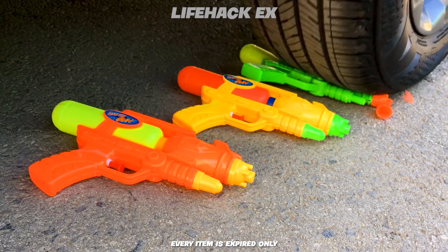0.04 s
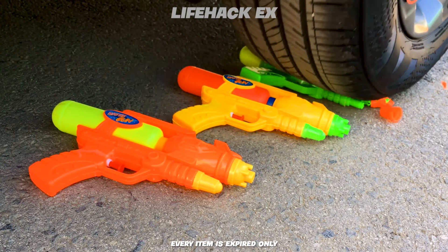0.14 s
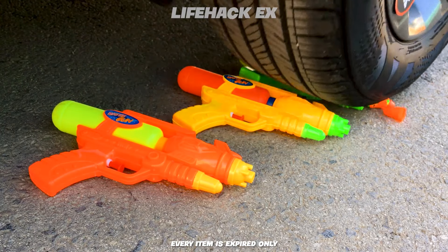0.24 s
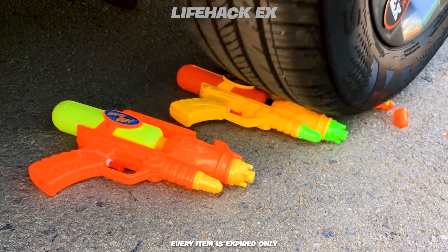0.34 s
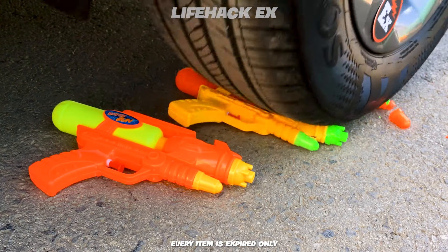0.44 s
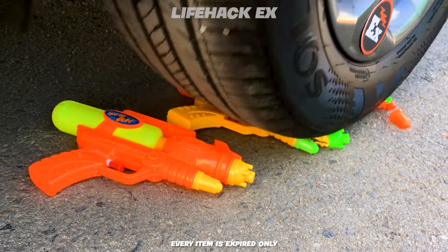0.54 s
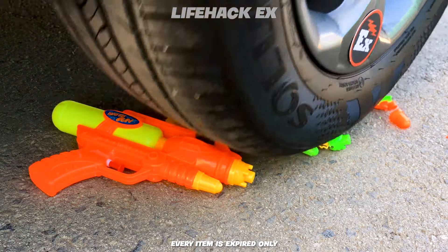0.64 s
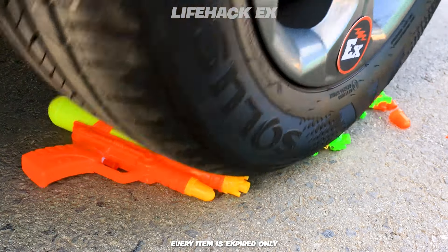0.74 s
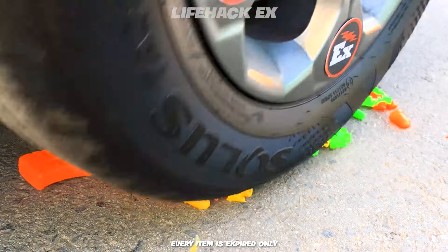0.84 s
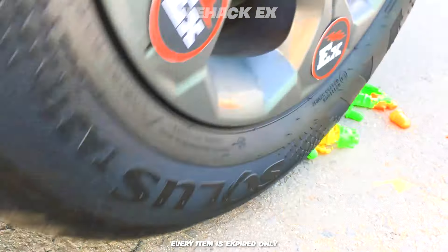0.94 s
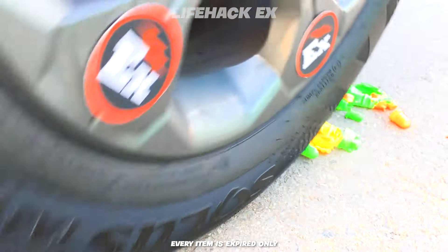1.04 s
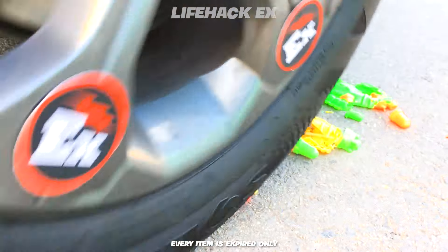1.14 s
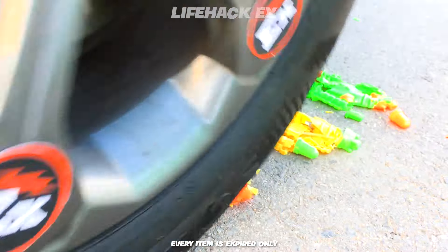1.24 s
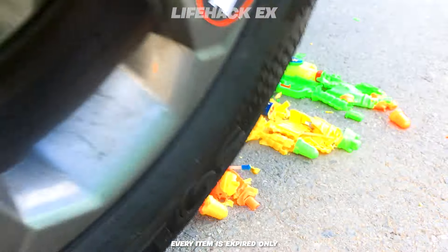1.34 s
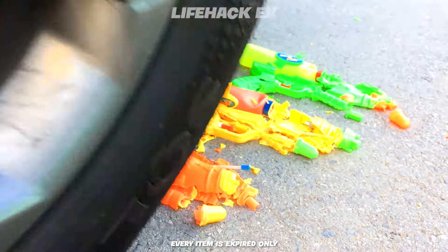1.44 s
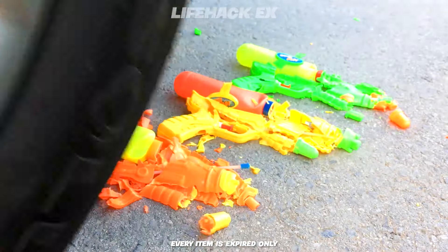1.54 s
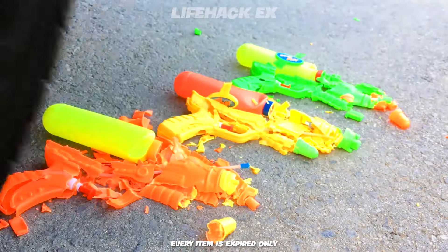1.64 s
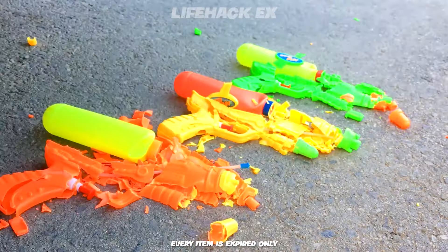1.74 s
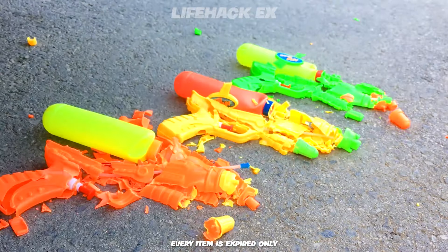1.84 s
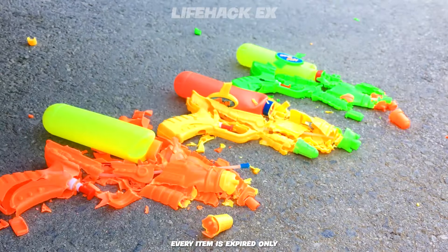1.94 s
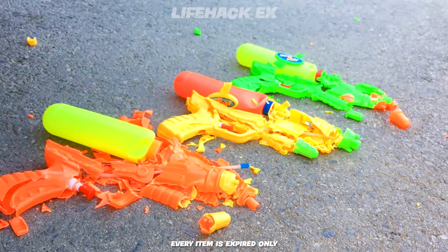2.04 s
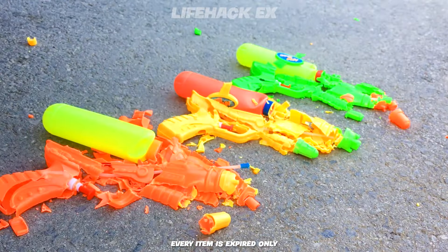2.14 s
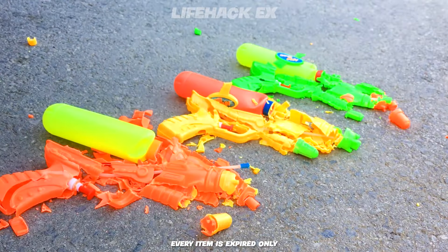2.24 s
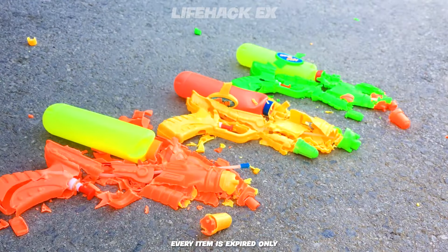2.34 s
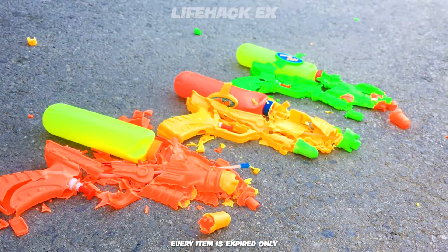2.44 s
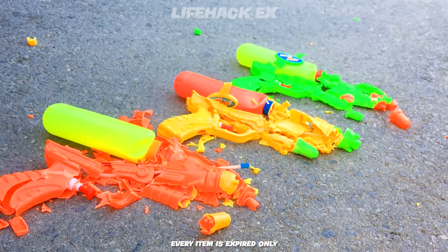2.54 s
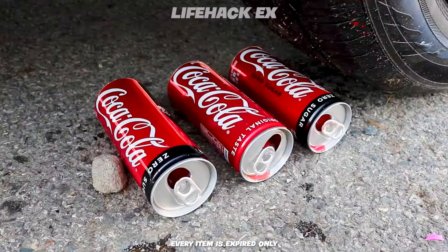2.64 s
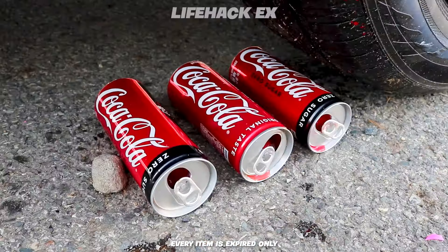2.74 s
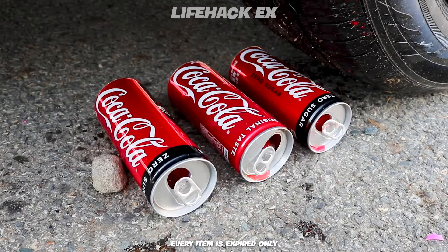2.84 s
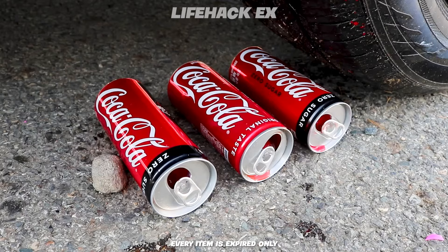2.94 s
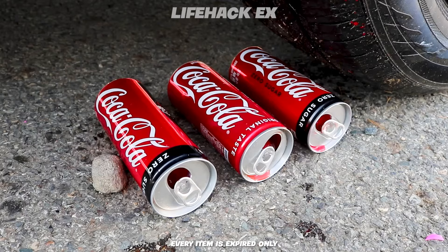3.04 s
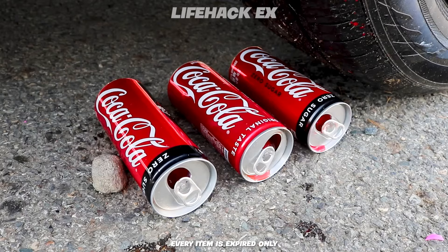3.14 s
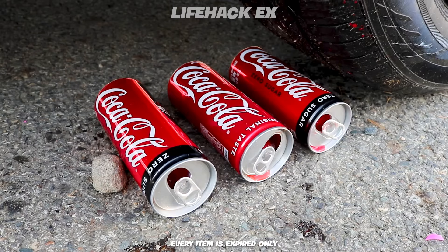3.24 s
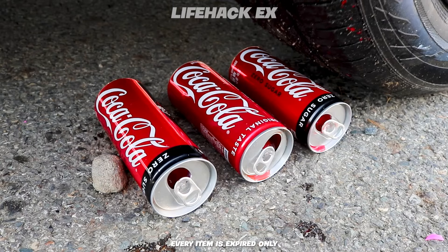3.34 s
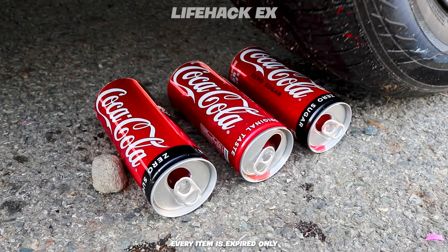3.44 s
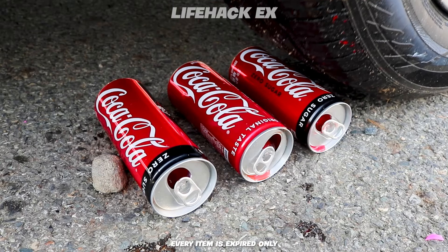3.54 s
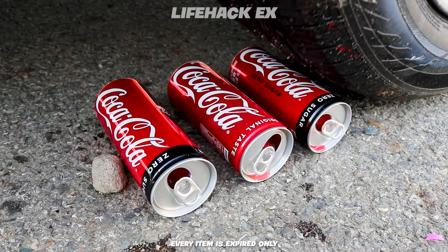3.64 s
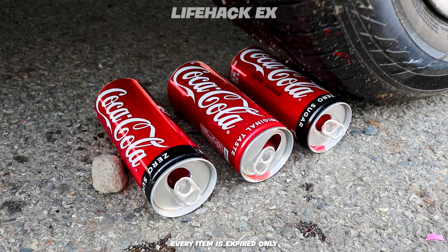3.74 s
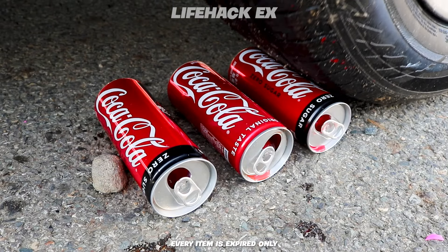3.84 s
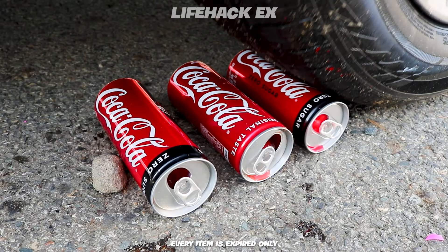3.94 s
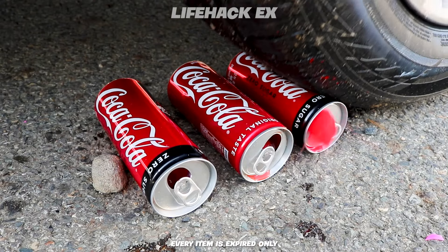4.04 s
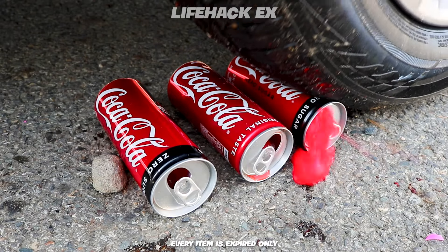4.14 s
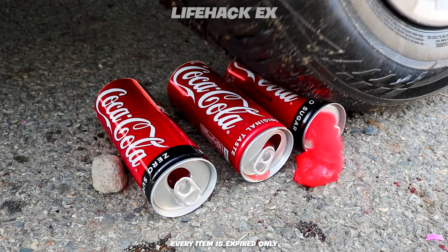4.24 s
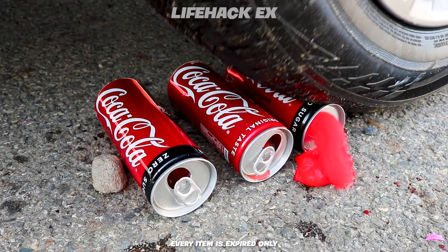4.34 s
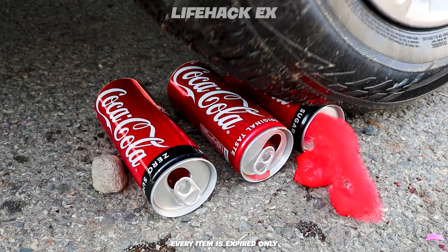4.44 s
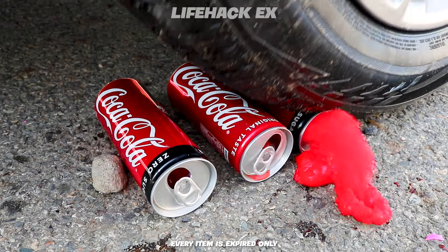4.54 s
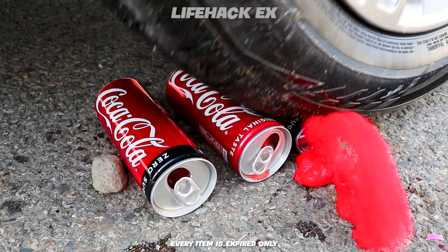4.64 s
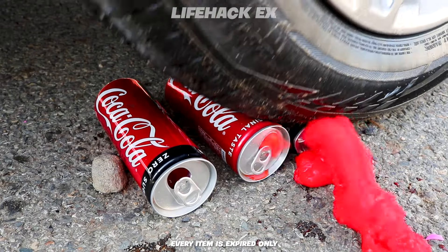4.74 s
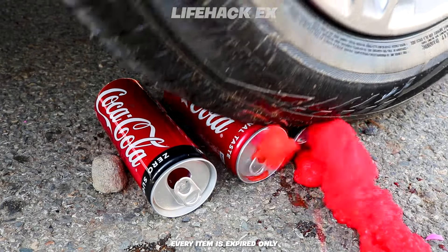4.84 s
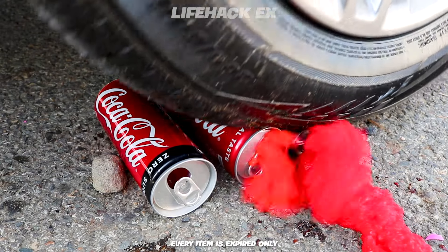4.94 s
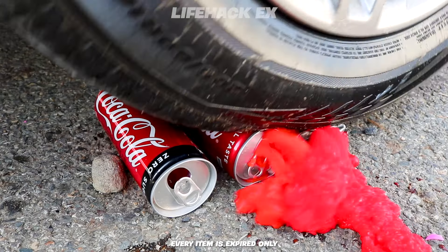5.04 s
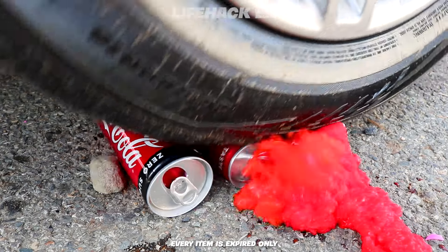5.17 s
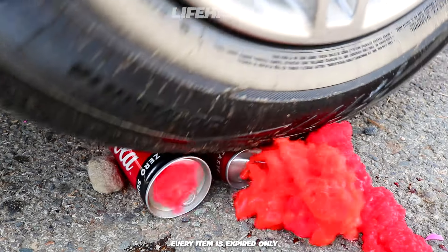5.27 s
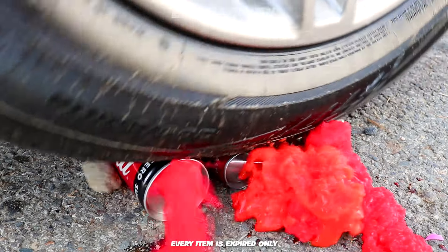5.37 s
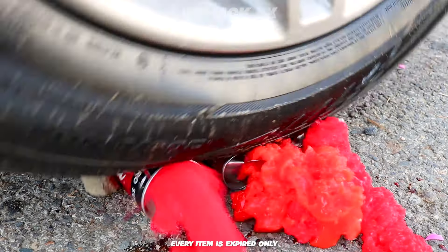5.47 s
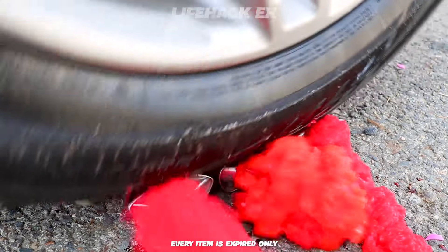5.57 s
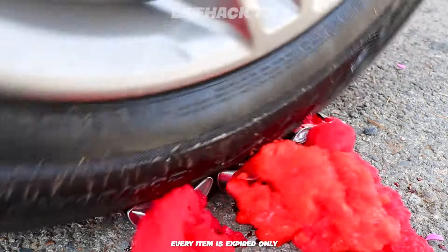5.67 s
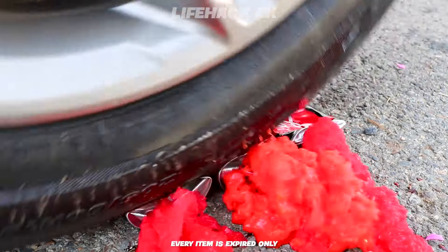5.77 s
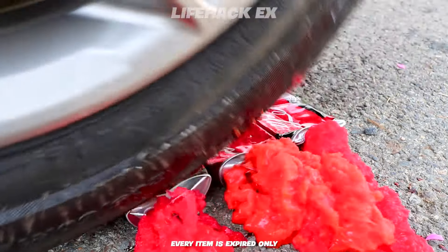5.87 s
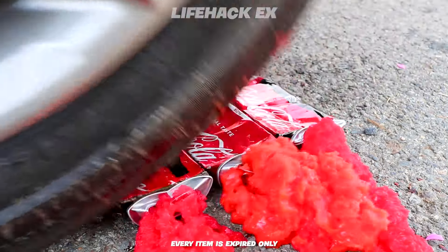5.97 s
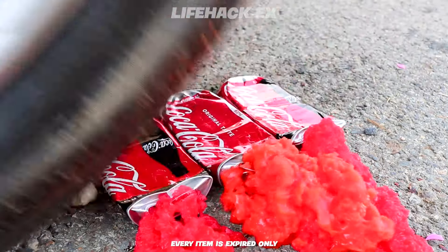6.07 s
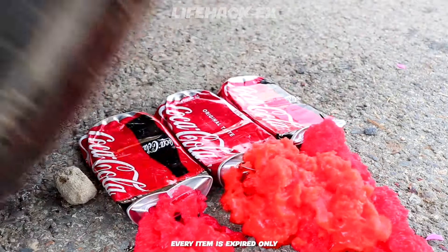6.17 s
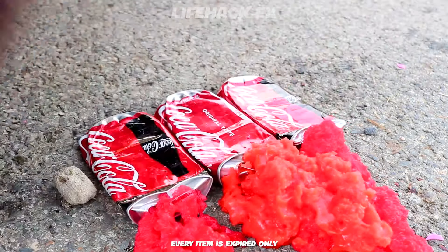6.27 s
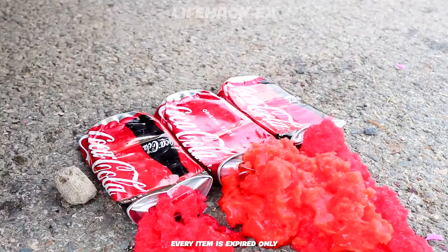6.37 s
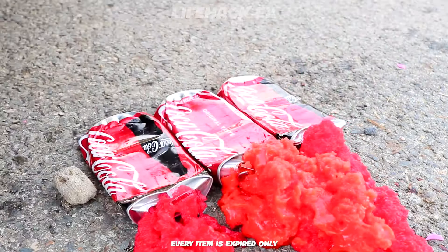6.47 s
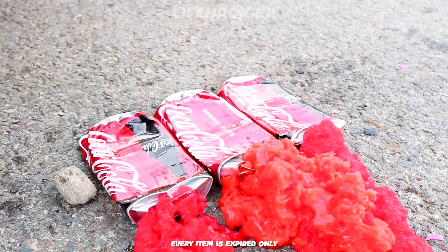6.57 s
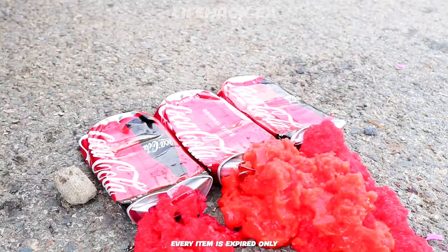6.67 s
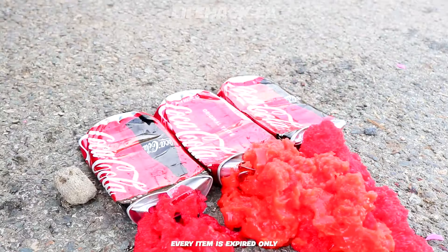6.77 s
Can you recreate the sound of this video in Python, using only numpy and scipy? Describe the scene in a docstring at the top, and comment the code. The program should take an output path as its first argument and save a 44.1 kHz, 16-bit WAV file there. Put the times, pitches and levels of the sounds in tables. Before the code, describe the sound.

From 0 s a slow tyre crushes hollow plastic toys on asphalt, close and centred: dense, loud, dry snaps with bright tearing edges and fine splintering, slightly overloaded, thin in body. Deep soft thuds lie beneath at about 0.1, 0.45 and 0.9 s. The breaking thins after 1.15 s and ends near 1.3 s. Sparse shard ticks settle until 1.9 s over very faint street hiss and engine hum. At 2.66 s the place changes to a wider, slightly louder airy hiss, with a small tick at 3.5 s. At 3.9 s rougher hiss jumps in and cans begin buckling: bright pings and crackle to 4.4 s, then heavier, lower ringing clanks from 4.5 s, in close clusters with tinny crumpling until 5.6 s, sparser to 5.95 s. The hiss then drops abruptly; quiet air remains until 6.8 s, with two faint ticks.

```python
"""Dense snaps of hollow plastic toys shattering under a slow car tyre on asphalt: torn noise ringing panels.
Then, in a second setting, slime-filled drink cans buckle in close clusters of ringing clanks over crackle
and a louder uneven background hiss. Below lie low tyre thuds, shaped-noise street hiss and an engine built
from a wavering firing tone. The toys sound from one point, the cans across a spaced pair;
a low cut thins all but thuds and engine."""
import sys
import numpy as np
from scipy import signal
from scipy.fft import rfft, irfft
from scipy.io import wavfile

SR = 44100
rng = np.random.default_rng(int(sys.argv[2]) if len(sys.argv) > 2 else 0)


def store_pcm(level_fs):
    """Save levels as 16-bit WAV."""
    pcm = np.round(np.clip(level_fs, -1, 1) * 32767).astype(np.int16)
    wavfile.write(sys.argv[1], SR, np.atleast_2d(pcm).T)


N = 300300


def amp(db):
    """Decibels to gain."""
    return 10 ** (np.asarray(db) / 20)


def rms_one(x):
    """Scale to unit rms, all channels together."""
    return x / np.sqrt(np.mean(x ** 2) + 1e-20)


def in_time(rows):
    """Columns of a curve table, and a gate that is open while the table lasts."""
    s, *columns = np.transpose(rows)
    t = np.arange(N) / SR
    return [np.interp(t, s, c) for c in columns], (t >= s[0]) & (t <= s[-1])


def spells(start_s, end_s, db, rise_db_per_s, sag_db_per_s, fall_db_per_s):
    """Level in dB: each spell rises to its start, sags while it lasts, falls after its end; the loudest wins."""
    t = np.arange(N)[:, None] / SR
    rise = rise_db_per_s * np.maximum(start_s - t, 0)
    sag = sag_db_per_s * np.clip(t - start_s, 0, end_s - start_s)
    fall = fall_db_per_s * np.maximum(t - end_s, 0)
    return (db - rise - sag - fall).max(axis=1)


def wander(rate_hz):
    """Slow random curve of unit rms: noise through two equal low-pass poles."""
    r = np.exp(-2 * np.pi * rate_hz / SR)
    noise = rng.standard_normal(N + SR)
    return rms_one(signal.lfilter([1], [1, -2 * r, r * r], noise)[SR:])   # first second settles the filter


def fade(t60_s, count):
    """Exponential decay, 60 dB in t60_s."""
    return amp(-60 * np.arange(count) / (t60_s * SR))


def resonate(x, hz, cycles):
    """A two-pole resonance that decays 60 dB within so many cycles."""
    r = amp(-60 * hz / (cycles * SR))
    return signal.lfilter([1, 0, -1], [1, -2 * r * np.cos(2 * np.pi * hz / SR), r * r], x)


def band(x, low_hz, high_hz):
    """Band-pass."""
    return signal.sosfilt(signal.butter(2, [low_hz, high_hz], "band", fs=SR, output="sos"), x)


def place(pair, left_right_db):
    """The nearer microphone hears it louder."""
    return pair * amp([left_right_db / 2, -left_right_db / 2]).reshape(2, -1)


def cracks(rows, cycles, crack_t60_s, treble_t60_s, ring_db, treble_db, tail_db, tail_t60_s, alike,
           scatter_db, blow_db, reach, body_hz, body_db, quickening, count=2400):
    """A blow and a short tear ring a panel, its neighbour and the body; high breaks tear quicker, ring more cycles."""
    out = np.zeros((2, N + count))
    n = np.arange(count)
    rise = np.minimum(n / 45, 1)
    for s, peak_db, hz, *own_treble_db in rows:
        shared, left, right = rng.standard_normal((3, count))
        tear = rise * (np.sqrt(alike) * shared + np.sqrt(1 - alike) * np.array([left, right]))
        short = (body_hz / hz) ** quickening
        tail = amp(tail_db) * short * fade(tail_t60_s * short, count)
        slow = tear * (fade(crack_t60_s * short, count) + tail)
        fast = tear * (fade(treble_t60_s, count) + tail * short)
        # one cycle of the ring
        blow = amp(blow_db) * np.sin(np.minimum(2 * np.pi * hz * n / SR, 2 * np.pi))

        torn = rms_one(band(slow, hz / reach, np.clip(hz * reach, 5000, SR / 3)))
        treble = rms_one(band(fast, 4000, 19000))
        crack = rms_one(torn + amp(treble_db + sum(own_treble_db)) * treble)

        ring_cycles = cycles / short ** 2
        neighbour_hz = min(hz * (1.4 + 0.12 * rng.standard_normal()), SR / 3)
        panel = rms_one(resonate(fast + blow, hz, ring_cycles))
        neighbour = rms_one(resonate(slow + blow, neighbour_hz, ring_cycles))
        body = rms_one(resonate(fast + blow, body_hz, cycles))
        crack = crack + amp(ring_db) * panel + amp(ring_db - 7.5) * neighbour + amp(body_db) * body

        crack = crack * amp(peak_db) / np.abs(crack).max()
        at = round(s * SR)
        out[:, at:at + count] += place(crack, scatter_db * rng.standard_normal())
    return out[:, :N]


def crackle(level_db, per_s, spread_db, cycles, low_hz, high_hz, treble_db, grain_t60_s, width, clump_db):
    """Clumps of small uneven breaks, dealt to panels of 16 pitches, each with a spit of treble."""
    born = rng.random(N) < per_s * amp(clump_db * wander(15)) / SR
    sizes = amp(spread_db * np.minimum(rng.exponential(1, N), 4)) * born
    tearing = signal.lfilter([1], [1, -amp(-60 / (grain_t60_s * SR))], sizes + 1e-18)
    mid, side = rng.standard_normal((2, N)) * tearing
    pair = mid + width * side * [[1], [-1]]

    dealt = rng.integers(0, 16, N // 300 + 1).repeat(300)[:N]   # a new panel every 300 samples
    rings = 0
    for k, hz in enumerate(np.geomspace(low_hz, high_hz, 16)):
        rings = rings + rms_one(resonate(pair * (dealt == k) + 1e-18, hz, cycles))
    spit = rms_one(band(pair, 4300, 12000))
    return amp(level_db) * (rms_one(rings) + amp(treble_db) * spit)


# Plastic shells breaking. Each row: start in seconds, peak in dB before overload and low cut.
SHELL_SNAPS = [(0.017, -1), (0.03, -2), (0.037, -5.5), (0.042, -4.5), (0.055, 2), (0.08, -3.5),
               (0.11, -1.5), (0.151, -4.5), (0.163, -6), (0.168, 1), (0.174, -7.5), (0.195, 0.5),
               (0.206, -1), (0.22, -3), (0.233, -1), (0.267, -15), (0.273, 5.5), (0.297, -8.5), (0.311, 1),
               (0.321, -5), (0.343, 1.5), (0.37, -3.5), (0.395, -13), (0.408, -2), (0.428, 1.5),
               (0.444, -2.5), (0.45, -1.5), (0.463, -1), (0.476, -1), (0.485, 0.5), (0.501, -1),
               (0.514, -3.5), (0.52, -2.5), (0.528, -6), (0.541, -2.5), (0.561, -0.5), (0.583, 0.5),
               (0.607, -1), (0.624, -4.5), (0.632, -3), (0.654, -0.5), (0.665, -0.5), (0.67, 2.5),
               (0.683, -2), (0.708, -4.5), (0.738, -5), (0.744, -2.5), (0.764, -5.5), (0.795, 0),
               (0.812, 0.5), (0.824, 0), (0.847, -1.5), (0.869, -1.5), (0.89, 0), (0.896, -6.5),
               (0.902, -3), (0.934, 1.5), (0.971, -8), (0.977, -3.5), (0.991, 1.5), (1.0, -3),
               (1.022, -4.5), (1.037, -2), (1.055, -0.5), (1.061, -0.5), (1.087, -1.5), (1.097, -9.5),
               (1.108, -0.5), (1.122, -5), (1.131, -6.5), (1.157, -20), (1.165, -11.5), (1.174, -1),
               (1.182, 1.5), (1.218, -16), (1.231, -9.5), (1.264, -14), (1.28, -24)]
# Plastic splintering under load; first row is the bed between surges.
# Each row: start in seconds, end in seconds, level at the start in dB.
SPLINTER_SPELLS = [(0, 1.3, -31.5), (0.06, 0.18, -23.5), (0.412, 0.72, -23), (0.798, 1.0, -24)]
SPLINTER_RISE_DB_PER_S, SPLINTER_SAG_DB_PER_S, SPLINTER_FALL_DB_PER_S = 1499, 7, 1797
PANEL_LOW_HZ, PANEL_HIGH_HZ = 1250, 6000
BIG_TOY_S = 1.045   # from here the largest toy breaks, ringing only the lower half of the range (in octaves)


def toys():
    """Loud snaps, each ringing a panel of random pitch, over denser, quieter splintering."""
    starts_s = np.array(SHELL_SNAPS)[:, :1]
    share_of_range = np.where(starts_s < BIG_TOY_S, 1, 0.5)
    height = rng.random((len(SHELL_SNAPS), 1)) ** 2 * share_of_range   # low panels are commoner
    panels_hz = PANEL_LOW_HZ * (PANEL_HIGH_HZ / PANEL_LOW_HZ) ** height
    snaps = cracks(np.hstack([SHELL_SNAPS, panels_hz]), cycles=8.9, crack_t60_s=0.026, treble_t60_s=0.016,
                   ring_db=-5.5, treble_db=0.2, tail_db=-17.5, tail_t60_s=0.13, alike=1, scatter_db=0,
                   blow_db=-2, reach=4.4, body_hz=1080, body_db=-17, quickening=0.1)

    load_db = spells(*np.transpose(SPLINTER_SPELLS),
                     SPLINTER_RISE_DB_PER_S, SPLINTER_SAG_DB_PER_S, SPLINTER_FALL_DB_PER_S)
    splinters = crackle(load_db, per_s=550, spread_db=3.0, cycles=3.3, low_hz=970, high_hz=5000,
                        treble_db=0.5, grain_t60_s=0.005, width=0, clump_db=-1)
    return snaps + splinters


# Can walls buckling. Each row: start in seconds, peak in dB before panning, overload and low cut,
# ring in Hz, treble in dB (its excess over the peak sets the brightness).
CAN_BUCKLES = [(3.942, -5, 3170, -16), (3.946, -4, 3330, -12), (3.958, -12, 3680, -14),
               (4.055, -4, 4190, -13), (4.087, -12, 3380, -19), (4.1, -6, 8950, -13),
               (4.142, -16.5, 11440, -24), (4.25, -1.5, 5210, -26), (4.261, -10, 6540, -15.5),
               (4.267, -4.5, 5270, -25), (4.289, -9, 3590, -11), (4.3, -11, 6100, -3),
               (4.313, -19.5, 3190, -17), (4.346, -7.5, 8500, -12), (4.392, -14.5, 7670, -11),
               (4.513, -13, 640, -41), (4.532, -1.5, 780, -37), (4.547, -8.5, 1250, -18),
               (4.61, 1, 1794, -28), (4.643, 4, 4126, -9.5), (4.769, 1.5, 2706, -11),
               (4.802, -2, 8670, -14), (4.888, -3.5, 6600, -13.5), (4.895, -3, 1620, -26.5),
               (4.9, -4, 8140, -14.5), (4.923, 1.5, 4550, -17.5), (4.944, -5.5, 5800, -15),
               (4.963, -12, 1330, -31.5), (5.019, 2, 1480, -18), (5.084, -4.5, 1830, -29),
               (5.093, -15.5, 1380, -26), (5.135, 1.5, 740, -31), (5.168, -8, 1160, -20),
               (5.177, -3, 3810, -18), (5.199, 0.5, 1200, -33), (5.214, -10, 910, -35.5),
               (5.286, -11.5, 8800, -22.5), (5.325, 0, 4010, -17.5), (5.333, -0.5, 3700, -5.5),
               (5.337, -1.5, 4000, -11.5), (5.356, -4, 7100, -5), (5.399, -8.5, 5250, -14.5),
               (5.404, -14.5, 1370, -30.5), (5.414, -8.5, 5360, -21), (5.425, -6, 3920, -29),
               (5.441, -9, 5330, -28), (5.458, -11, 1150, -28), (5.466, -16.5, 6000, -21),
               (5.548, 2, 935, -18), (5.574, -1, 1170, -5.5), (5.59, 1.5, 4400, -12.5),
               (5.603, -5.5, 1150, -38), (5.658, -15, 2180, -34), (5.695, -13, 1310, -36),
               (5.706, -5, 1350, -38), (5.726, -11, 1310, -42), (5.748, -15.5, 1840, -44),
               (5.796, -18.5, 1140, -41), (5.824, -15.5, 870, -24), (5.851, -2, 9370, -20),
               (5.921, -18.5, 1320, -44)]
# Tin crumpling under load. Each row: start in seconds, end in seconds,
# level of the crackle at the start in dB, level of the low body at the start in dB.
CRUMPLE_SPELLS = [(3.955, 4.286, -35, -52), (4.616, 4.89, -43.5, -40), (4.902, 4.923, -19, -29),
                  (5, 5.203, -38.5, -38.5), (5.357, 5.489, -25.5, -31.5), (5.539, 5.61, -28, -28),
                  (5.701, 5.838, -38, -30.5), (5.908, 5.938, -45, -40.5)]
CRUMPLE_RISE_DB_PER_S, CRUMPLE_SAG_DB_PER_S, CRUMPLE_FALL_DB_PER_S = 304, 12, 198
# The tyre rolls from the right to the middle. Each row: time in seconds, left over right in dB.
CAN_PAN = [(4.4, -1), (4.6, 0)]


def cans():
    """Buckles over fine crackle and the low, dense crumple of the can bodies, with an uneven hiss behind."""
    rows = [(s, peak_db, hz, treble_db - peak_db) for s, peak_db, hz, treble_db in CAN_BUCKLES]
    buckles = cracks(rows, cycles=11.7, crack_t60_s=0.02, treble_t60_s=0.011, ring_db=9.5, treble_db=2.6,
                     tail_db=-13, tail_t60_s=0.12, alike=0.51, scatter_db=3.0, blow_db=-1.5, reach=2.51,
                     body_hz=1290, body_db=-7, quickening=0.3)

    start_s, end_s, *levels_db = np.transpose(CRUMPLE_SPELLS)
    crackle_db, body_db = [spells(start_s, end_s, db, CRUMPLE_RISE_DB_PER_S, CRUMPLE_SAG_DB_PER_S,
                                  CRUMPLE_FALL_DB_PER_S) for db in levels_db]
    fine = crackle(crackle_db, per_s=890, spread_db=2.7, cycles=25.0, low_hz=2600, high_hz=7500,
                   treble_db=-19, grain_t60_s=0.008, width=1.0, clump_db=2.0)
    bodies = crackle(body_db, per_s=1200, spread_db=3.0, cycles=15.0, low_hz=850, high_hz=1700,
                     treble_db=-26.5, grain_t60_s=0.012, width=0.53, clump_db=2.5)
    (pan_db,), _ = in_time(CAN_PAN)
    return place(buckles + fine + bodies + uneven_hiss(), pan_db)


# Louder background hiss between two abrupt level jumps.
# Each row: time in seconds, level in dB before the mix to the pair.
UNEVEN_HISS_LEVEL = [(3.898, -39.5), (4.45, -43), (5.968, -52.5)]
# Its colour. Each row: frequency in Hz, relative density in dB per Hz.
UNEVEN_HISS_SPECTRUM = [(450, -32.5), (616, -5.5), (1750, -7), (3090, -1), (11300, -12.5), (12800, -8.5),
                        (16000, -16.5)]
UNEVEN_HISS_WAVER_DB = 2.2   # rms


def uneven_hiss():
    """Shaped noise with a randomly wavering level, partly shared by the pair."""
    shared, left, right = hiss(UNEVEN_HISS_LEVEL, UNEVEN_HISS_SPECTRUM, channels=3)
    return amp(UNEVEN_HISS_WAVER_DB * wander(23)) * (shared + 0.96 * np.array([left, right]))


# Shards and grit settling. Each row: start in seconds, peak in dB before the low cut,
# ring in Hz, own treble in dB added to the common treble.
SETTLING_TICKS = [(1.314, -53, 8950, 8), (1.349, -31, 1580, 2), (1.368, -41, 3030, 4),
                  (1.389, -41.5, 3070, -3), (1.428, -46, 686, 3), (1.488, -54, 11950, 4),
                  (1.521, -51, 11800, -1), (1.603, -39, 4260, -11), (1.635, -37.5, 11030, 9),
                  (1.751, -41.5, 8500, 1), (1.861, -50, 2153, -16), (3.516, -31, 2204, -6),
                  (3.875, -32, 700, -14), (6.178, -47, 929, -28), (6.759, -32, 2806, -21)]


def settling():
    """Faint single breaks, nearly alike in both channels."""
    return cracks(SETTLING_TICKS, cycles=14.0, crack_t60_s=0.0091, treble_t60_s=0.016, ring_db=4.1,
                  treble_db=1.8, tail_db=-9, tail_t60_s=0.22, alike=0.99, scatter_db=0.5, blow_db=5.0,
                  reach=2.4, body_hz=860, body_db=-10.5, quickening=0.11)


# Tyre thudding over the heap. Each row: time in seconds, level of the lowest band in dB.
TYRE_THUDS = [(.08, -24), (.45, -25.5), (.6, -32), (.87, -27), (.97, -33)]
THUD_RISE_DB_PER_S, THUD_FALL_DB_PER_S = 248, 249.5
ROLL_END_S, ROLL_DB = 1.2, -50.5   # steady rumble between thuds


def thud():
    """The tyre's carcass booms in two low resonances, with a faint third band of noise above."""
    s, db = np.transpose(TYRE_THUDS)
    start_s, end_s, db = np.append(s, 0), np.append(s, ROLL_END_S), np.append(db, ROLL_DB)
    level_db = spells(start_s, end_s, db, THUD_RISE_DB_PER_S, 0, THUD_FALL_DB_PER_S)
    push = rng.standard_normal((3, N))
    boom = rms_one(band(push[0], 29, 40))
    boom = boom + amp(-12.0) * rms_one(band(push[1], 76, 98))
    boom = boom + amp(-27.5) * rms_one(band(push[2], 125, 150))
    return amp(level_db) * boom


# Engine, first setting. Each row: time in seconds, firing rate in Hz, level of the firing tone in dB.
IDLE_FIRST = [(1.3, 29.88, -88.5), (2.07, 30.35, -64), (2.662, 31.2, -72)]
# Engine, second setting: the level jumps up abruptly, then dies away.
# Each row: time in seconds, firing rate in Hz, level of the firing tone in dB.
IDLE_SECOND = [(2.663, 24.4, -93.5), (3.1, 24.27, -66), (3.89, 27.4, -71), (3.91, 28, -40),
               (4.2, 30.4, -63.5), (5.96, 32.4, -69.5), (6.0, 31.6, -86), (6.81, 34.2, -81)]
# Overtones, first setting. Each row: multiple of the firing rate, level relative to the firing tone in dB.
IDLE_OVERTONES = [(3, -21), (5, -20), (7, -34), (11, -32), (15, -35)]
STEADY_WAVER_DB, LOADED_WAVER_DB = 2.4, 7   # rms for each overtone; the whole tone wavers half as much


def engine(rows, overtones, waver_db):
    """The firing tone wavers; the exhaust pipe favours its odd multiples."""
    (hz, level_db), gate = in_time(rows)
    turn = 2 * np.pi * np.cumsum(hz) / SR
    tone = np.sin(turn)
    for multiple, db in overtones:
        tone = tone + amp(db + waver_db * wander(7.5)) * np.sin(round(multiple) * turn)
    return gate * amp(level_db + waver_db / 2 * wander(3.4)) * np.sqrt(2) * tone


def hiss(rows, spectrum, channels):
    """Smooth noise of a given spectrum, levelled over time."""
    (level_db,), gate = in_time(rows)
    hz, db = np.transpose(spectrum)
    bins_hz = np.linspace(1, SR / 2, N // 2 + 1)
    colour = amp(np.interp(np.log(bins_hz), np.log(hz), db))
    noise = irfft(rfft(rng.standard_normal((channels, N))) * colour, N)
    return gate * amp(level_db) * rms_one(noise)


# Far hiss, first setting. Each row: time in seconds, level in dB before the low cut.
STREET_FIRST = [(1.3, -65), (1.5, -73.5), (1.75, -69.5), (1.9, -64), (2.662, -68.5)]
# Its colour. Each row: frequency in Hz, relative density in dB per Hz.
SPECTRUM_FIRST = [(260, -42.5), (450, -15.5), (979, -13), (1630, -18.5), (3280, -25), (3870, -21.5),
                  (4990, -29.5), (16000, -38.5)]


def street_first():
    """Far street hiss from one point."""
    return hiss(STREET_FIRST, SPECTRUM_FIRST, channels=1)


# Far hiss, second setting. Each row: time in seconds, level in dB before the mix to the pair.
STREET_SECOND = [(2.663, -56), (5.965, -56.5), (5.972, -65), (6.81, -59)]
# Its colour. Each row: frequency in Hz, relative density in dB per Hz.
SPECTRUM_SECOND = [(450, -38), (650, -8.5), (1150, -9.5), (1400, -3.5), (1740, -8.5), (2000, -4),
                   (2930, -3), (4870, -10.5), (9500, -9.5), (11200, -18), (12700, -8), (16000, -18.5)]
STREET_PAN_DB, STREET_LAG_SAMPLES = -2, 12


def street_second():
    """The street lies to the left of the pair: louder and earlier there, partly shared."""
    shared, left, right = hiss(STREET_SECOND, SPECTRUM_SECOND, channels=3)
    near = shared + 1.74 * left
    far = np.roll(shared, STREET_LAG_SAMPLES) + 0.2 * right
    return place(np.array([near, far]), STREET_PAN_DB)


LOW_CUT_HZ = 453.5
LOPSIDED = 0.034   # share of the squared signal that the pair's amplifier adds


def scene():
    """Toys first, then cans; microphones overload and a low cut takes the body of the crushing away."""
    low_cut = signal.cheby2(8, 37, LOW_CUT_HZ, "high", fs=SR, output="sos")
    first = signal.sosfilt(low_cut, np.clip(toys(), -1, 1) + settling() + street_first())
    second = signal.sosfilt(low_cut, np.clip(cans(), -1, 1) + street_second())
    second = second + LOPSIDED * band(second.mean(axis=0) ** 2, 90, 450)
    # deep rumble bypasses the low cut
    engines = engine(IDLE_FIRST, IDLE_OVERTONES, STEADY_WAVER_DB)
    engines = engines + engine(IDLE_SECOND, [(3, -30.0)], LOADED_WAVER_DB)
    return first + second + thud() + engines


CUTOFF_HZ = 16400


def record(dry):
    """The loudest cracks overload; the top is cut."""
    top_cut = signal.cheby2(12, 60, CUTOFF_HZ, fs=SR, output="sos")
    return signal.sosfilt(top_cut, np.clip(dry, -1, 1))


dry = scene()
out = record(dry)
store_pcm(out)
```